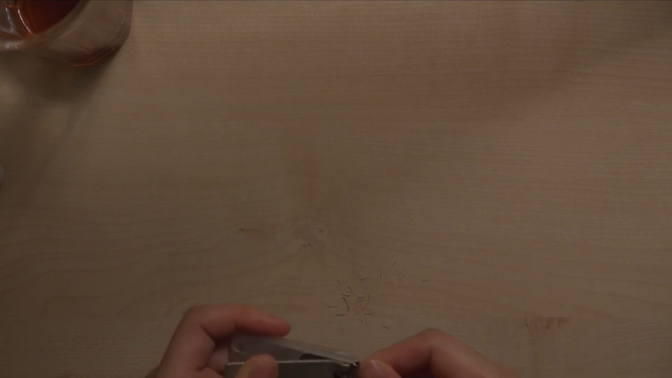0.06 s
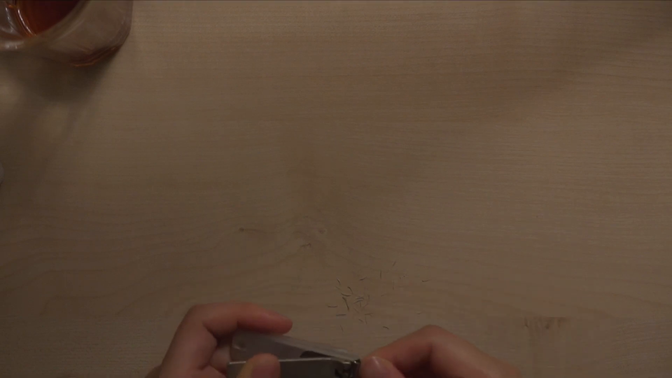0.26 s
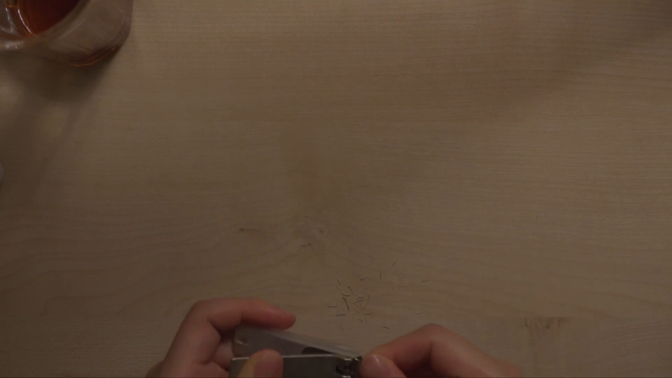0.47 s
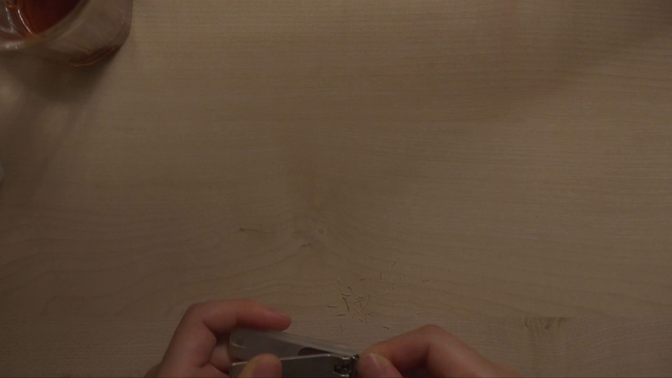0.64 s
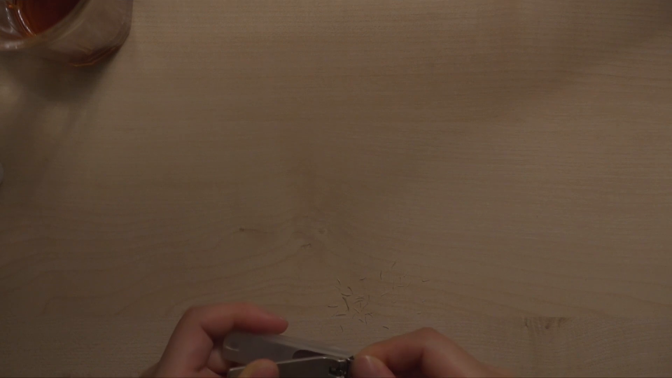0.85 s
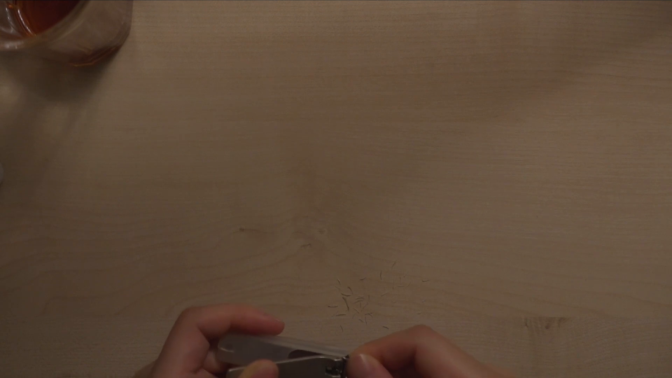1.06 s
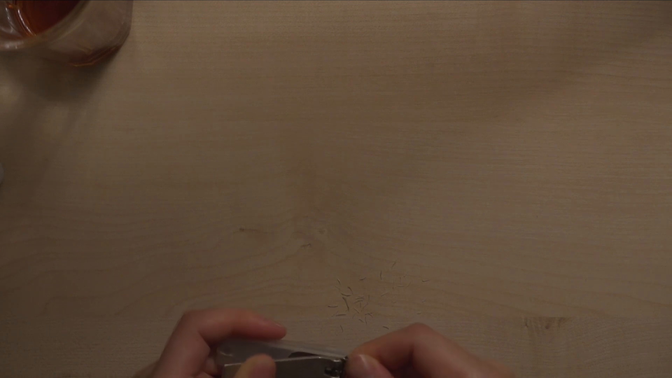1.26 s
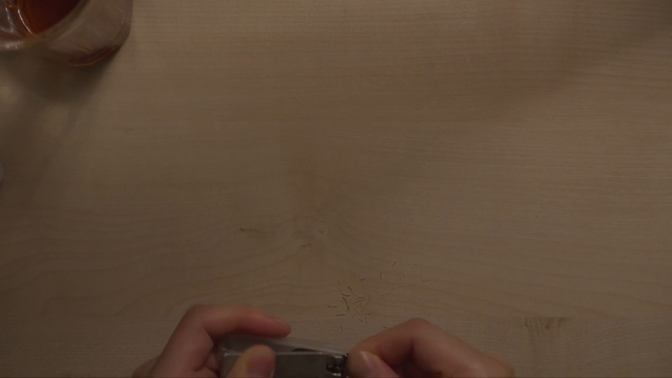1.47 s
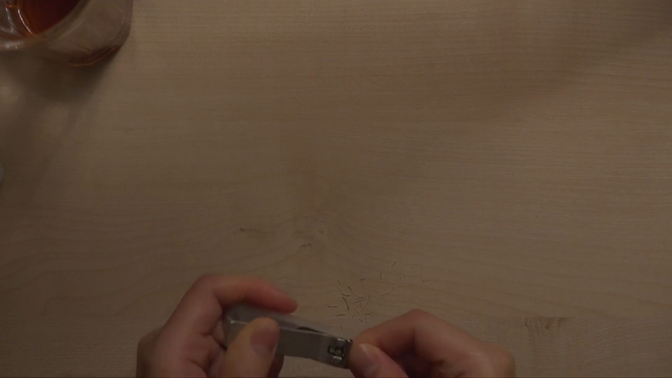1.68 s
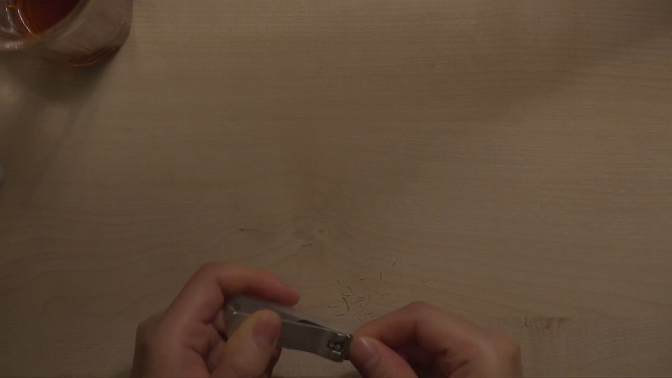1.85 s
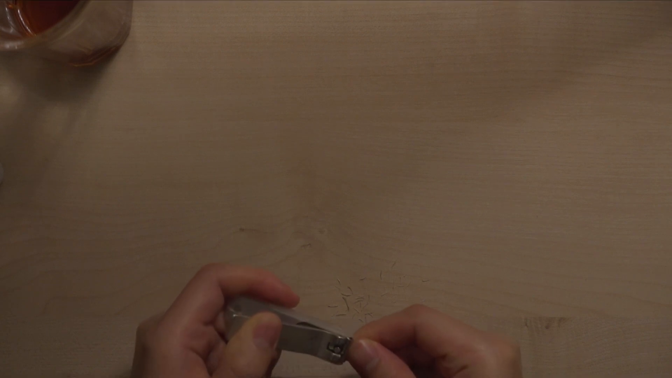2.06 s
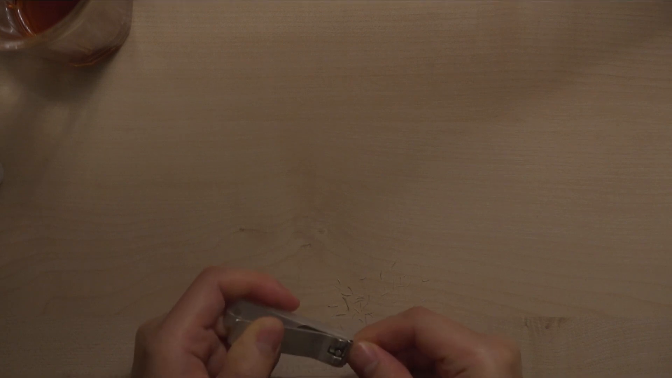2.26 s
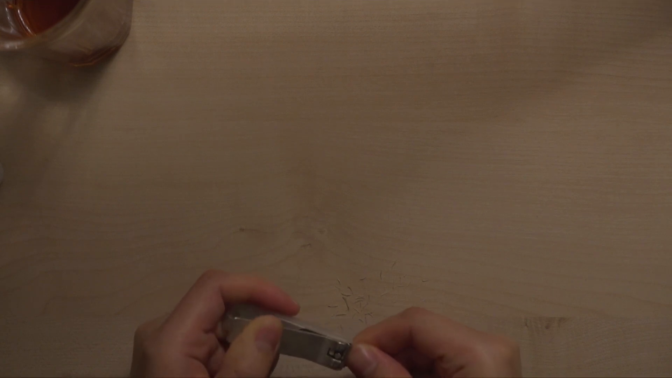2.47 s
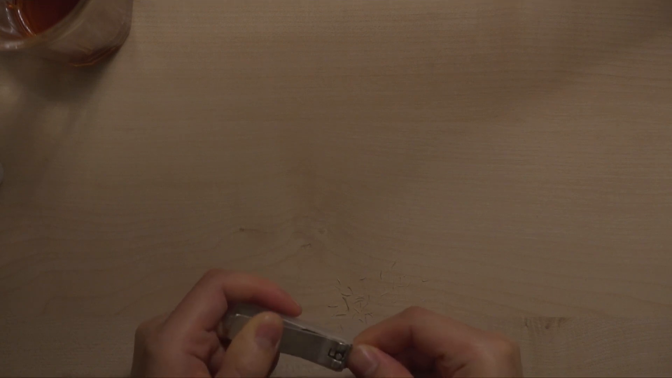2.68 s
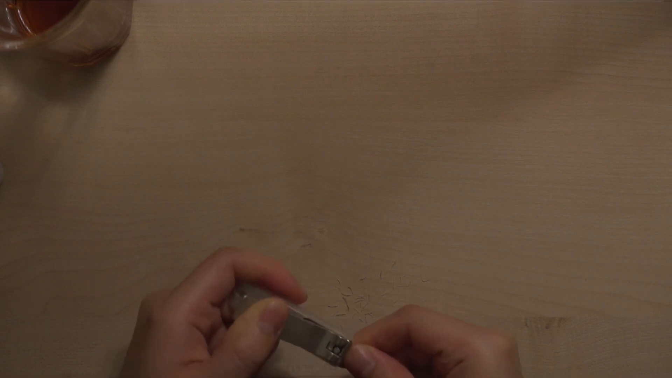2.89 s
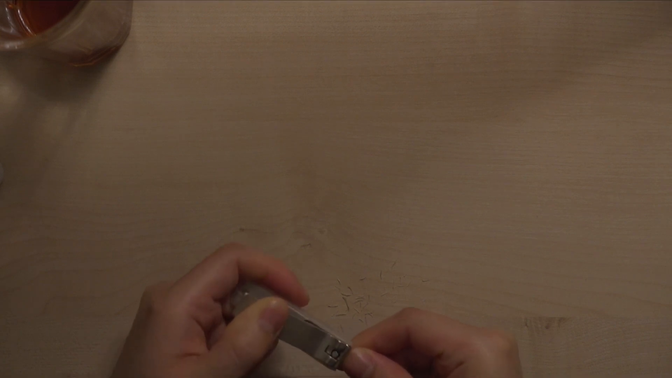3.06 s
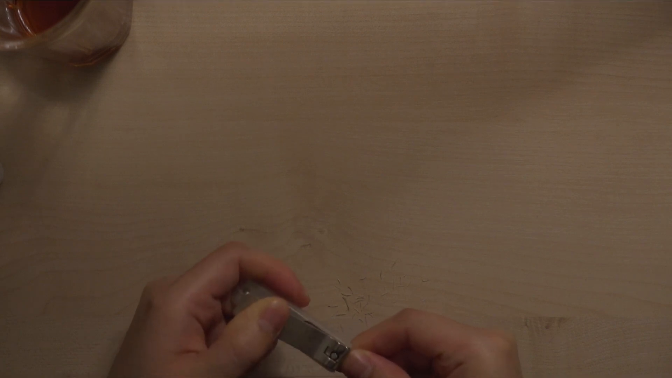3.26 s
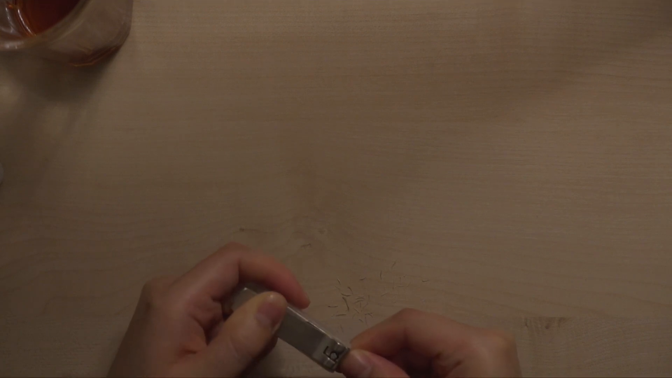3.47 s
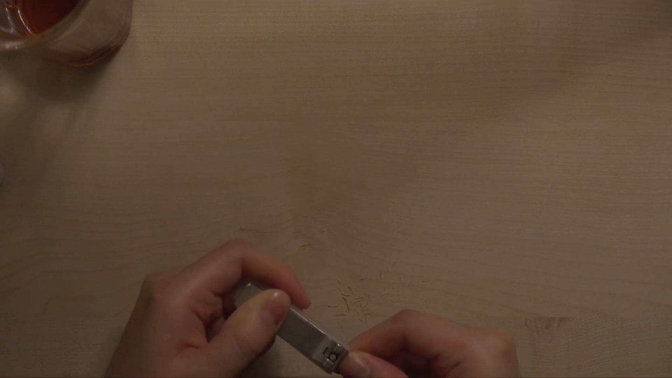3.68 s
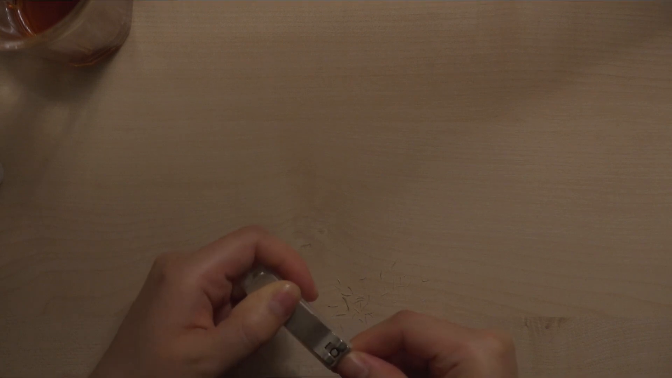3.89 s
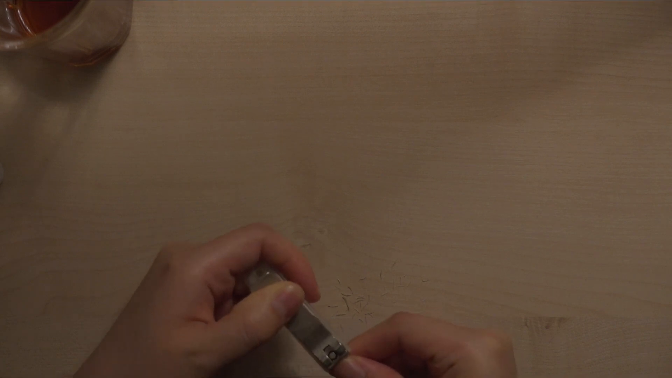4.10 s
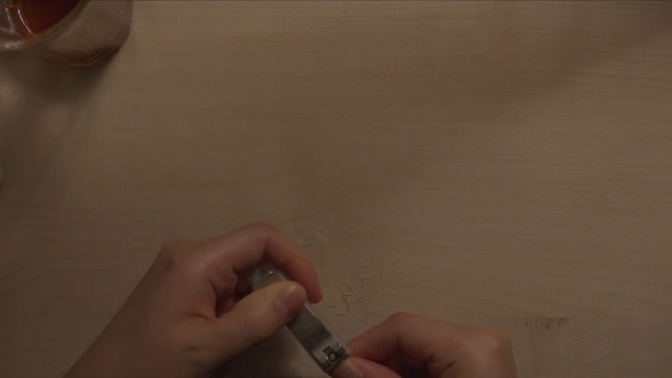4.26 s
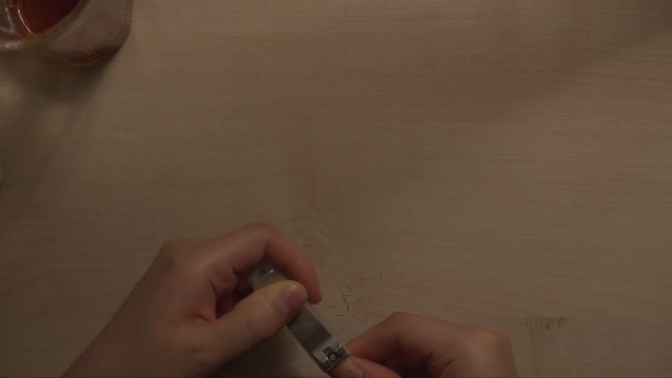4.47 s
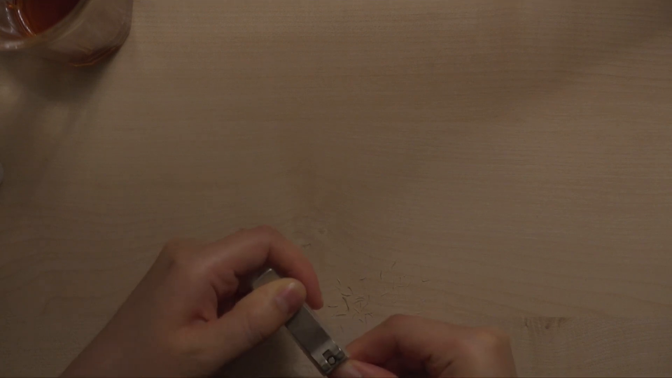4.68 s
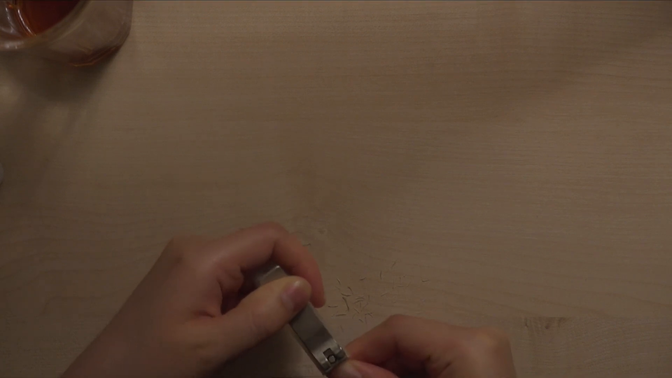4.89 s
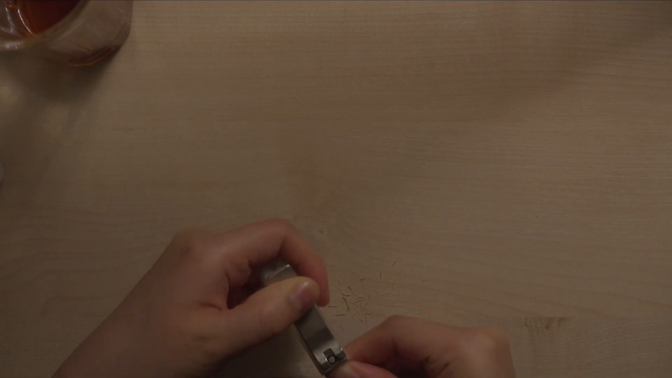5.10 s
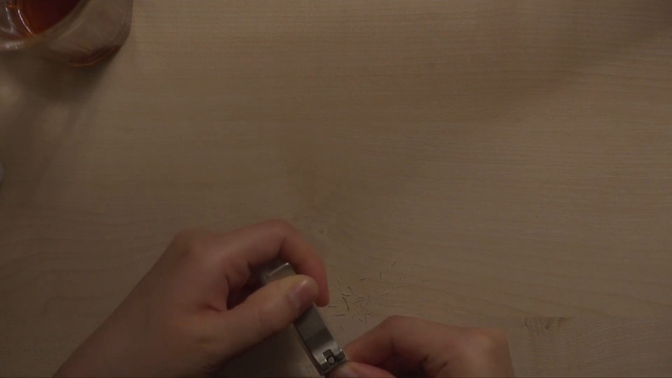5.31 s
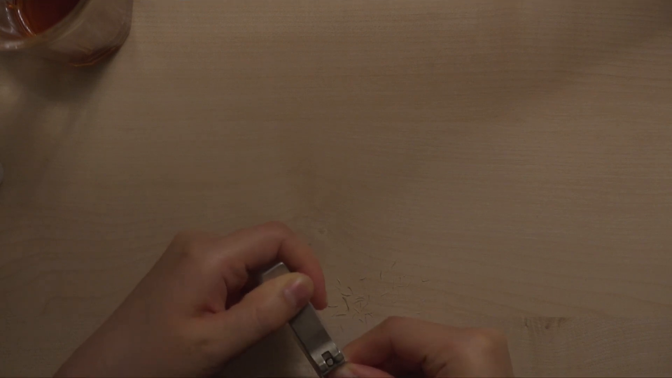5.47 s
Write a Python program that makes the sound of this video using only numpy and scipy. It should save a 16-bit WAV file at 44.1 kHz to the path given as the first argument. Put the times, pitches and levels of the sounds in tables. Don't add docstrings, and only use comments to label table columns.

```python
import sys
import numpy as np
from scipy import signal
from scipy.io import wavfile
from scipy.ndimage import uniform_filter1d, minimum_filter1d

SR = 44100
rng = np.random.default_rng(int(sys.argv[2]) if len(sys.argv) > 2 else 0)


def volts(x):
    e = np.asarray(x, float) / 20
    return 10 ** e


def generate_wav(signal):
    frames = np.transpose(np.atleast_2d(signal))
    scaled = np.clip(frames, -1, 1) * 32767
    pcm = np.round(scaled).astype(np.int16)
    wavfile.write(sys.argv[1], SR, pcm)


N = 244314

# (frequency [Hz], density [dB per Hz])
RUMBLE = [(25, -31.5), (60, -26), (155, -30.5), (300, -60.5)]
# (frequency [Hz], density [dB per Hz])
DUCT = [(120, -47.5), (183, -22), (415, -4), (891, -6), (1050, -9.5), (1500, -13), (2250, -11),
        (3300, -27.5)]
# (frequency [Hz], density [dB per Hz])
HISS = [(300, -36), (2960, -17), (5390, -21.5), (12600, -28), (15900, -47.5)]
# (frequency [Hz], width [Hz], gain [dB])
GRILLE = [(667.3, 56, 1.5), (916, 62, 2), (1462, 116, 3.5), (2300, 270, 3)]
# (frequency [Hz], left-right correlation [-1..1])
HUM_LIKENESS = [(60, 0.49), (130, 0.755), (290, 0.998), (640, 0.825), (1410, 0.202), (3100, 0.013),
                (6820, 0.0087), (15000, 0.12)]

# (delay after cut [s], level [dB], left minus right [dB])
ECHOES = [(.0045, -24, 2), (.0107, -16, 1), (.0121, -18, 0), (.0139, -17, 2), (.0151, -14, -4),
          (.0185, -19, 2), (.0238, -16, 3), (.0267, -19, 2), (.0403, -18, 4), (.0420, -19, 2)]
# (frequency [Hz], T60 [s])
ROOM_T60 = [(1000, 0.495), (2500, 0.5638), (5000, 0.503), (8000, 0.468), (12000, 0.3805), (16000, 0.285)]
# (frequency [Hz], level [dB])
ROOM_COLOUR = [(700, -16), (1500, -4), (3000, -4), (6000, -3.5), (11000, 1.5), (16000, 0.5)]
# (frequency [Hz], left-right correlation [-1..1])
ROOM_LIKENESS = [(60, 0.46), (130, 0.8), (290, 0.92), (640, 0.7), (1410, 1), (3100, 0.362), (6820, -0.282),
                 (15000, 0.257)]

# (time [s], peak [dB], pitch [Hz], ring T60 [s], crack [dB])
TICKS = [
    (1.2878, -64.5, 2400, 0.0086, -8),
    (1.8864, -54, 3288, 0.0143, 5),
    (2.1172, -48, 3240, 0.0118, -19),
    (2.1560, -54, 2900, 0.0061, 7),
    (3.5600, -59.5, 4610, 0.0118, 18),
    (4.232, -58, 4500, 0.0084, -5),
]
# (time [s], low push [dB], pin modes [dB], grip bands gain [dB], edge modes [dB])
CUTS = [
    (1.4048, -25, 4.5, -0.5, 3),
    (2.5887, -25, 1, 2, 0.98),
    (3.5747, -30.5, -3.5, 2, 1.5),
    (4.7425, -17.5, -1.5, 2, 1.42),
]
# (frequency [Hz], width [Hz], gain [dB])
LEVER = [(1479, 1063, 7), (1942, 913, 5), (4198, 453, 3.5), (4728, 300.6, 11)]
# (frequency [Hz], width [Hz], gain [dB])
JAWS = [(6405, 671, 11.85), (8280, 1980, 1.13), (9720, 1400, 3.1), (10770, 1300, 1.74)]
# (frequency [Hz], width [Hz], gain [dB])
PIN = [(3032, 560, -0.5), (3550, 330, -3.5)]
# (frequency [Hz], width [Hz], gain [dB])
GRIP = [(2400, 367, 4.5), (5355, 504, -3), (10290, 1650, -1.5), (14100, 260, -6)]
# (frequency [Hz], width [Hz], gain [dB])
EDGES = [(12150, 1334, 3.5), (16280, 1524, 9.5)]


def at_hz(points, hz):
    table = np.array(points)
    return np.interp(np.log(hz), np.log(table[:, 0]), table[:, 1])


def rms_one(x):
    return x / np.sqrt(np.mean(x ** 2) + 1e-20)


def add(track, sound, time_s):
    i = round(time_s * SR)
    track[..., i:i + sound.shape[-1]] += sound[..., :track.shape[-1] - i]


def drift(rate_hz):
    r = np.exp(-80 * np.pi * rate_hz / SR)
    noise = rng.standard_normal(N // 40 + 2002)
    slow = signal.lfilter([1], [1, -2 * r, r * r], noise)[2000:]
    return np.interp(np.arange(N) / 40, np.arange(len(slow)), rms_one(slow))


def ring(clicks, hz, t60_s):
    r, w = volts(-60 / (t60_s * SR)), 2 * np.pi * hz / SR
    return signal.lfilter([np.sin(w)], [1, -2 * r * np.cos(w), r * r], clicks)


def resonate(x, hz, width_hz, gain_db):
    a, w, gain = np.pi * width_hz / SR, 2 * np.pi * hz / SR, volts(gain_db)
    return signal.lfilter([1 + a * gain, -2 * np.cos(w), 1 - a * gain], [1 + a, -2 * np.cos(w), 1 - a], x)


def diffuse_bands(size, likeness):
    edges_hz = 22 * 2 ** (np.arange(30) / 3)
    white = rng.standard_normal((2, 2, size))
    for k, (low_hz, high_hz) in enumerate(zip(edges_hz, edges_hz[1:])):
        band_pass = signal.butter(2, [low_hz, high_hz], "band", fs=SR, output="sos")
        mid, side = signal.sosfilt(band_pass, white[k % 2])
        hz = np.sqrt(low_hz * high_hz)
        alike = np.clip(at_hz(likeness, hz), -1, 1)
        yield hz, np.sqrt(1 + alike) * mid + np.sqrt(1 - alike) * side * [[1], [-1]]


def hum(level_db=-62.5, sink_db_per_s=0.1322, patchy_db=.8, lump_hz=1500):
    shared, slow = drift(8.3), drift(1.8)
    out = 0
    for hz, band in diffuse_bands(N, HUM_LIKENESS):
        flicker_db = patchy_db * (shared + 0.2 * slow + 1.06 * drift(12.0)) / (1 + (hz / lump_hz) ** 2)
        density = np.linalg.norm([volts(at_hz(source, hz)) for source in (RUMBLE, DUCT, HISS)])
        out = out + density * volts(flicker_db) * band
    for hz, width_hz, gain_db in GRILLE:
        out = resonate(out, hz, width_hz, gain_db)
    return volts(level_db - sink_db_per_s * np.arange(N) / SR) * rms_one(out)


def room(x, late_db=-35, late_longer=3.06, tail_db=-34, dense_s=.0107, smear_s=.0006):
    t = np.arange(SR) / SR
    scatter = volts(7.5 - 640.0 * t) * (t > .002)
    build_up = volts(5) * np.clip(0.631 + (t - dense_s) / 0.088, 0, 1)
    onset = np.where(t < dense_s, scatter, build_up)
    tail = 0
    for hz, band in diffuse_bands(SR, ROOM_LIKENESS):
        lost_db = 60 * t / at_hz(ROOM_T60, hz)
        late = volts(late_db - lost_db / late_longer)
        tail = tail + volts(at_hz(ROOM_COLOUR, hz)) * (volts(-lost_db) + late) * band
    response = volts(tail_db) * onset * tail
    for delay_s, level_db, pan_db in ECHOES:
        rough = rng.standard_normal((2, 128)) * np.exp(-t[:128] / smear_s)
        rough = rough / np.linalg.norm(rough, axis=1)[:, None]
        add(response, volts(level_db + 3 + pan_db * np.array([[.5], [-.5]])) * rough, delay_s)
    return signal.fftconvolve(response, x[None], axes=1)[:, :N]


def ticks(crack_hz=9000, touch_s=0.00065, crack_decay_s=0.00036):
    out, click = np.zeros(N), np.eye(1, 1024)[0]
    t = np.arange(len(click)) / SR
    bright = signal.butter(1, [2500, crack_hz], "band", fs=SR, output="sos")
    soft = 1.436 * np.minimum(t / touch_s, 1)
    for time_s, peak_db, hz, t60_s, crack_db in TICKS:
        noise = rng.standard_normal(len(click)) * np.exp(-t / crack_decay_s)
        crack = volts(crack_db) * signal.sosfilt(bright, noise)
        add(out, volts(peak_db) * (soft * ring(click, hz, t60_s) + crack), time_s)
    return out


def snap_steel(blow, pin_db, grip_db, edges_db, small_hz=4200):
    steel = signal.sosfilt(signal.butter(2, small_hz, "high", fs=SR, output="sos"), blow)
    for modes, more_db in (LEVER, 0), (JAWS, 0), (PIN, pin_db), (GRIP, grip_db), (EDGES, edges_db):
        for hz, width_hz, gain_db in modes:
            steel = resonate(steel, hz, width_hz, gain_db + more_db)
    return steel / np.abs(steel).max()


def cuts(snap_db=6.5, push_hz=650, push_t60_s=0.00448, push_lag_s=.0001, rebound_s=.0006):
    near, around, t = np.zeros((2, N)), np.zeros(N), np.arange(2048) / SR
    bass_cut = signal.butter(1, 260, "high", fs=SR, output="sos")
    blow = 1. * (t == 0)
    for time_s, push_db, pin_db, grip_db, edges_db in CUTS:
        steel = volts(snap_db) * snap_steel(blow, pin_db, grip_db, edges_db)
        common, own = rng.standard_normal(len(t)), rng.standard_normal((2, len(t)))
        splinters = volts(-15) * (common + .5 * own) * np.exp(-t / .0011) * (t > .0002)
        spread = blow + .55 * np.roll(blow, round(rebound_s * SR)) + splinters
        thump = ring(np.roll(blow, round(push_lag_s * SR)), push_hz, push_t60_s)
        push = volts(snap_db + push_db) * signal.sosfilt(bass_cut, thump)
        add(near, signal.lfilter(steel, [1], spread) + push, time_s)
        add(around, steel, time_s)
    return near, around


def scene(top_hz=15680):
    near, around = cuts()
    touches = ticks()
    steep = signal.ellip(10, .5, 60, top_hz, fs=SR, output="sos")
    far = signal.sosfilt(steep, room(around + volts(-13) * touches) + hum())
    return (near + touches + far) * volts([[.4], [-.4]])


def band_limit(x):
    return signal.sosfilt(signal.butter(12, 17110, fs=SR, output="sos"), x)


def record(dry, limit_db=-13, release_s=0.01867, look_ahead_s=0.00161):
    over_db = np.maximum(20 * np.log10(np.abs(dry).max(axis=0) + 1e-9) - limit_db, 1e-3)
    t = np.arange(N) / SR / release_s
    duck_db = np.exp(np.maximum.accumulate(np.log(over_db) + t) - t)
    ahead = round(look_ahead_s * SR)
    held_db = -minimum_filter1d(-duck_db, size=2 * ahead + 1)
    limited = dry * volts(-uniform_filter1d(held_db, size=3 * ahead))
    steep = signal.cheby2(10, 60, 17200, fs=SR, output="sos")
    return band_limit(signal.sosfilt(steep, limited))


dry = scene()
out = record(dry)
generate_wav(out)
```